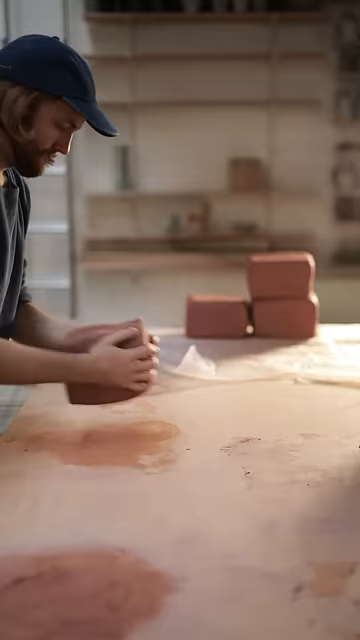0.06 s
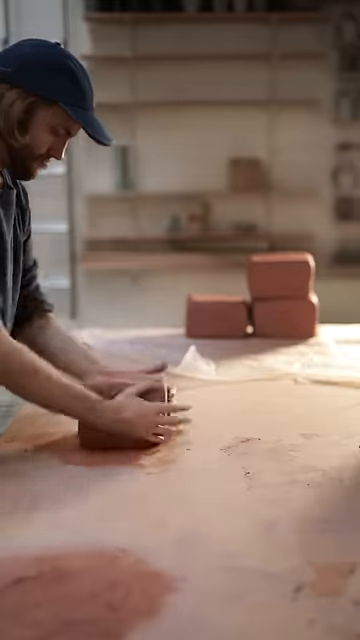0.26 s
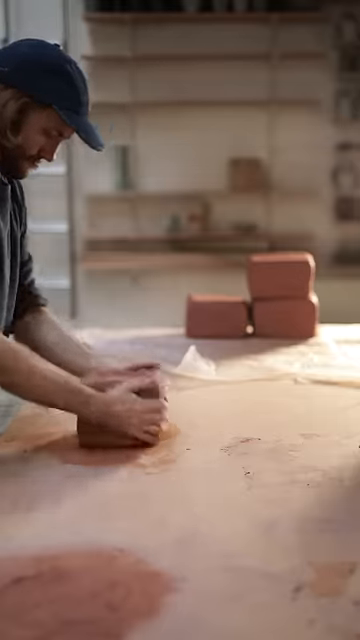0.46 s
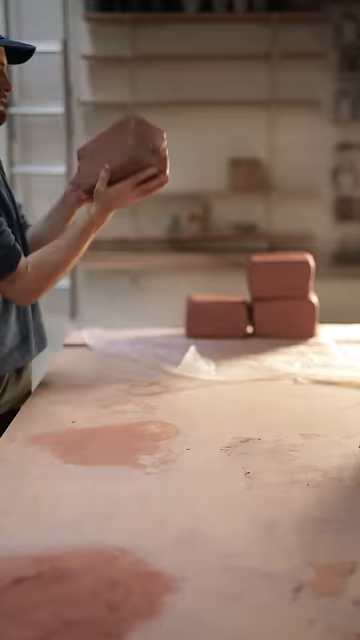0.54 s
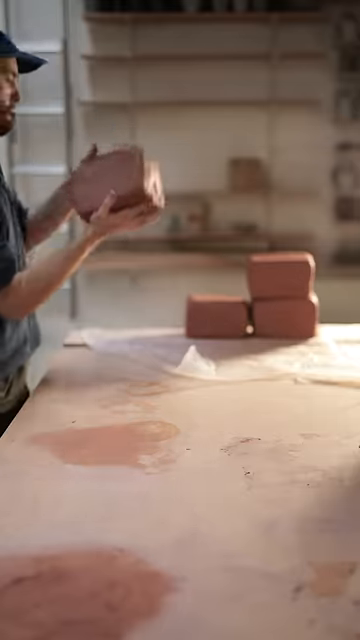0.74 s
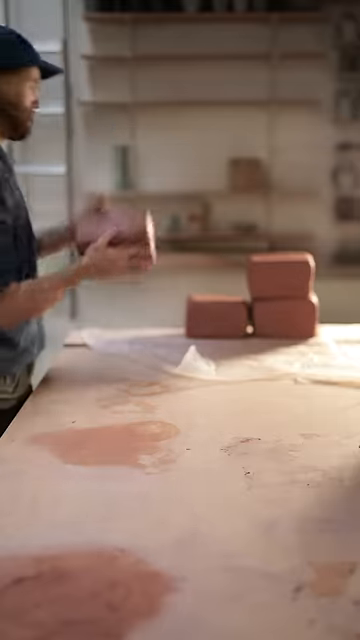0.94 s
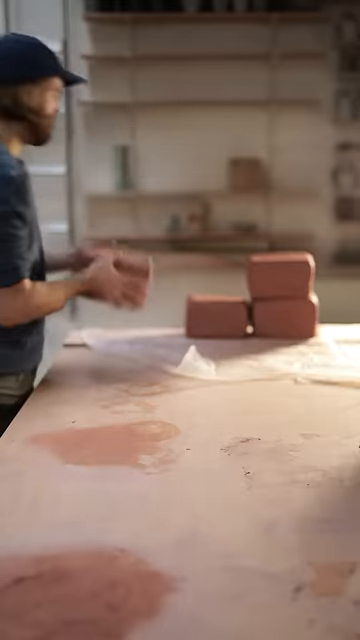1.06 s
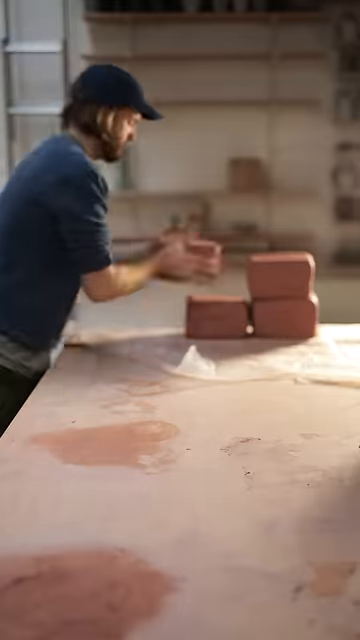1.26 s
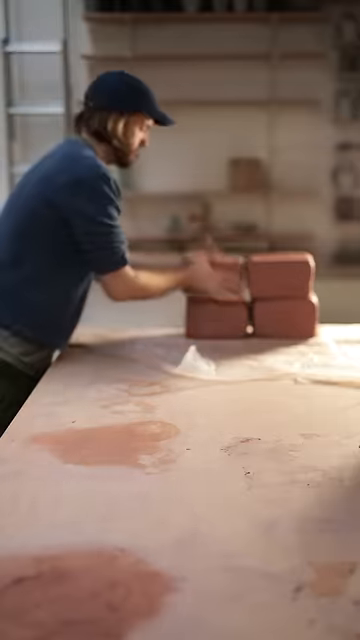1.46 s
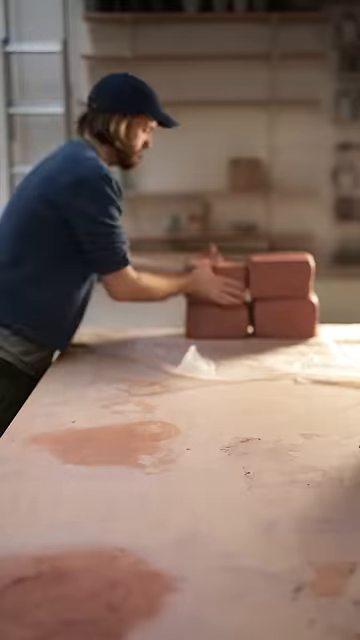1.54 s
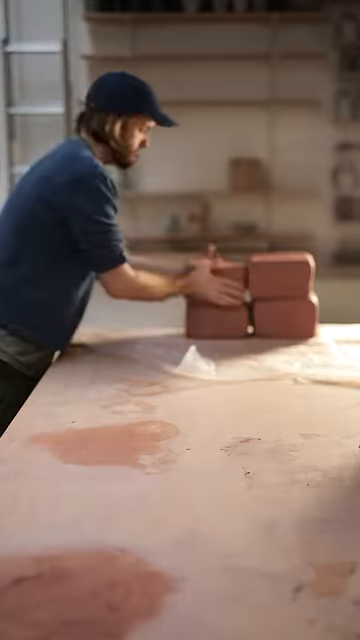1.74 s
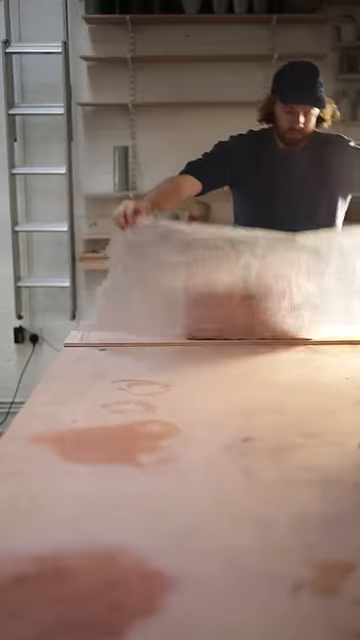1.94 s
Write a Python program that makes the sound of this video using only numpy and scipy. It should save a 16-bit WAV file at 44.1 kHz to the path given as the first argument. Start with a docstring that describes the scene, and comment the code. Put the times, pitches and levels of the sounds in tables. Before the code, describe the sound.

A heavy clay block slams onto a wooden table, then thuds onto a stack.

```python
"""A heavy block of wet clay is slammed on a wooden workbench, picked up, caught and set on a stack.
Each impact excites damped modes, and the workshop reverberates after every blow. Palms slap the clay,
peel away and slide with friction noise; clothes and feet shuffle over the quiet air of the room.
The slam overloads a limiter, which ducks and then lets the reverberation swell back."""
import sys
import numpy as np
from scipy import signal
from scipy.fft import rfft, irfft
from scipy.io import wavfile
from scipy.ndimage import map_coordinates

SR = 44100
rng = np.random.default_rng(int(sys.argv[2]) if len(sys.argv) > 2 else 0)


def master_out(mix):
    """Clip the mix to full scale and print it as 16-bit PCM to the path in sys.argv[1]."""
    frames = np.transpose(np.atleast_2d(mix))
    ceiling = np.clip(frames, -1, 1)
    pcm = np.round(ceiling * 32767).astype(np.int16)
    wavfile.write(sys.argv[1], SR, pcm)


N = 88200
T = np.arange(N) / SR
BUILD_UP_S = 0.0068
CRACKLE_PER_S, CRACKLE_DB = 400, 4

# Spectrum of a wet contact: frequency_hz, level_db
SMACK_SPECTRUM = [(40, -52), (200, -24.5), (800, -2), (1700, 4), (3000, -4), (4400, -7.5), (7000, -6.5),
                  (8500, -13), (11000, -10.5), (13500, -19), (16000, -34)]


def amp(db):
    """Amplitude ratio of a level in decibels."""
    return 10 ** (np.asarray(db) / 20)


def unit(x):
    """Normalisation to rms 1."""
    return x / np.sqrt(np.mean(x ** 2) + 1e-20)


def along(points, hz):
    """Interpolation of (frequency, value) points on a logarithmic frequency axis."""
    frequencies, values = np.transpose(points)
    return np.interp(np.log(hz + 1), np.log(frequencies + 1), values)


def noise(spectrum):
    """Spectral shaping of white noise; the result has rms 1, so the spectrum's levels are relative."""
    gain = amp(along(spectrum, np.fft.rfftfreq(N, 1 / SR)))
    return unit(irfft(rfft(rng.standard_normal(N)) * gain, N))


def fade(t60, t=T):
    """Exponential decay by 60 dB in t60 seconds."""
    return np.exp(-np.log(1000) * t / np.maximum(t60, 1e-4))


def rise(seconds):
    """Smooth onset with a finite rise time."""
    return 1 - np.exp(-(T / seconds) ** 2)


def swell(start_s, rise_s, hold_s, release_s):
    """Trapezoidal envelope of a stroke."""
    return np.interp(T, start_s + np.cumsum([0, rise_s, hold_s, release_s]), [0, 1, 1, 0])


def grain(per_s, depth_db):
    """Random amplitude modulation of rms 1."""
    wander = map_coordinates(rng.standard_normal(N // 8), [T * per_s], mode="wrap")
    return unit(amp(depth_db * wander))


def ring(modes):
    """Superposition of damped modes struck together."""
    return sum(amp(db) * np.sin(2 * np.pi * hz * T) * fade(t60) for hz, db, t60 in modes)


def at(start_s, x):
    """Time shift; a negative start leaves only the tail."""
    shift = int(round(start_s * SR))
    return np.pad(x, (shift, 0))[:N] if shift >= 0 else np.pad(x, (0, -shift))[-shift:]


def lowcut(x, hz):
    """High-pass filter: the contact sounds carry no deep bass."""
    return signal.sosfilt(signal.butter(3, hz, "high", fs=SR, output="sos"), x)


def room(spectrum):
    """Reverberation: the diffuse field builds up, then each frequency decays at its own rate."""
    # Reverberation time of the workshop: frequency_hz, t60_s
    decay_times = [(60, 0.5), (150, 0.62), (400, 0.39), (1000, .52), (2500, 0.5), (6000, 0.43),
                   (10000, 0.41), (15000, 0.27)]
    hz, t, bands = signal.stft(noise(spectrum), SR, nperseg=512)
    decaying = bands * fade(along(decay_times, hz)[:, None], t)
    return signal.istft(decaying, SR, nperseg=512)[1][:N] * rise(BUILD_UP_S)


def slams():
    """Impact excitation: the flat face claps, splats and displaces air; bench and room ring on."""
    # Blows on the bench, the first heard only as a tail: start_s, level_db
    blows = [(-.19, 3), (0.2677, 3)]
    # Modes of the bench and the air squeezed from under the block: pitch_hz, level_db, t60_s
    clap_modes = [(413, -3, 0.15), (1052, 19, 0.017), (1247, 9.5, 0.013), (1594, -5, 0.005),
                  (2120, -13, 0.0083), (3500, -4, 0.003)]
    # Lightly damped bench modes: pitch_hz, level_db, t60_s
    bench_modes = [(113.76, 3, 0.43), (180.2, -8, .6), (373, 5.5, 0.41), (515, 4.5, 0.22),
                   (803, -11, 0.477), (862, -6.5, 0.4), (1012, -6.5, 0.52), (1283, -2, 0.32)]
    # Spectrum sent into the room: frequency_hz, level_db
    room_spectrum = [(25, -58), (50, -25.5), (80, -14), (115, -10.5), (170, -12.5), (225, -12.5), (300, -6),
                     (370, -2), (480, -4), (660, -5), (1000, -6), (1350, -9), (1600, -13.5), (2100, -14),
                     (2500, -22), (3400, -22.5), (5100, -33), (7000, -25.5), (8500, -36), (11000, -36.5),
                     (13500, -45.5), (15500, -62)]
    attack_s, puff_s = 0.0015, 0.0014
    clap = ring(clap_modes) * rise(attack_s)
    puff = amp(-9) * (1 - T / puff_s) * np.exp(-T / puff_s) * rise(attack_s)
    strongest_db = max(db for hz, db, t60 in bench_modes)
    bench = amp(-15.5 - strongest_db) * ring(bench_modes) * rise(BUILD_UP_S)
    out = np.zeros(N)
    for start_s, db in blows:
        splat = at(0.002038, amp(1) * noise(SMACK_SPECTRUM) * fade(t60=0.0179))
        reverb = amp(-7) * room(room_spectrum)
        out += at(start_s, amp(db) * (clap + splat + puff + bench + reverb))
    return out


def workshop_air():
    """Ambient noise: the quiet air of the workshop is a stationary floor."""
    # Spectrum of the ambience: frequency_hz, level_db
    spectrum = [(15, -58), (25, -24), (107, -19.5), (193, -7.5), (221, -22.5), (253, -7.5), (305, -15.5),
                (523, -21.5), (648, -21), (703, -15.5), (3000, -30), (5010, -38.5), (15500, -31.5)]
    return amp(-56.5) * noise(spectrum)


def pats():
    """Cavity resonance: air caught between palms and clay faces pops with a hollow note and a smack."""
    # Contacts: start_s, level_db, pitch_hz, decay_cycles, smack_db, room_db
    touches = [(0.1995, -4, 1570, 7.1, -17, -32), (0.2056, -25.5, 990, 12, -6, -44),
               (0.2103, -15.5, 1402, 17, -13, -38), (0.7876, -42, 2200, 6.5, 5.5, -8),
               (.7978, -44.5, 1700, 7.1, 11.5, -18), (0.8004, -47.5, 1180, 8, 5.5, -18),
               (0.9502, -32, 1760, 46, -7, -14.5), (0.9578, -37.5, 2220, 13, -1, -10),
               (.9632, -19.5, 565, 3.7, -6.5, -23), (1.5636, -18, 1210, 30, -6.5, -26),
               (1.6206, -24, 2950, 50, -1.5, -11)]
    # Spectrum sent into the room: frequency_hz, level_db
    room_spectrum = [(100, -20.5), (300, -0.5), (550, 9), (1100, -4), (2200, -1.5), (3500, -9),
                     (7500, -13.5), (12000, -28.5), (16000, -35)]
    out = np.zeros(N)
    for start_s, db, hz, cycles, smack_db, room_db in touches:
        pop = ring([(hz, 0, cycles / hz)])
        smack = amp(smack_db) * noise(SMACK_SPECTRUM) * fade(t60=0.012)
        direct = lowcut((pop + smack) * rise(seconds=0.00032), hz=278)
        reverb = amp(room_db) * room(room_spectrum)
        out += at(start_s, amp(db) * (direct + reverb))
    return out


def peels():
    """Adhesion: wet skin crackles as it peels off the clay."""
    # Separations: start_s, level_db, t60_s
    releases = [(0.201, -22, .17)]
    # Spectrum of the crackle: frequency_hz, level_db
    spectrum = [(300, -25), (800, 2.5), (2400, 5.5), (4500, -11), (7000, -6.5), (11000, -6.5), (16000, -26)]
    return sum(at(start_s, amp(db) * noise(spectrum) * grain(CRACKLE_PER_S, CRACKLE_DB) * fade(t60))
               for start_s, db, t60 in releases)


def slides():
    """Sliding friction: skin hisses over smooth clay, drags where it presses harder, sticks and slips."""
    # Hand strokes: start_s, rise_s, hold_s, release_s, hiss_db, drag_db
    strokes = [(0.504, .07, 0.038, 0.089, -53, -52), (0.657, 0.093, 0.021, 0.011, -83, -56.5),
               (1.765, 0.081, 0.076, 0.27, -55, -43)]
    # Spectrum of light friction: frequency_hz, level_db
    hiss_spectrum = [(1500, -27), (5000, -16), (7500, -2.5), (11000, -0.5), (13500, -7.5), (16000, -17)]
    # Spectrum of heavy friction: frequency_hz, level_db
    drag_spectrum = [(88, -42), (150, -11), (221, -13), (257, -6), (289, -38), (324, -8), (486, -1.5),
                     (612, -6.5), (2310, -4.5), (3970, -13), (9820, -12.5), (15000, -37.5)]
    # A fingertip sticks and lets go: start_s, level_db
    slips = [(1.831, -36.5), (1.858, -35), (1.933, -41.5)]
    out = np.zeros(N)
    for *timing, hiss_db, drag_db in strokes:
        envelope = swell(*timing) * grain(per_s=300, depth_db=1.3)
        out += envelope * (amp(hiss_db) * noise(hiss_spectrum) + amp(drag_db) * noise(drag_spectrum))
    for start_s, db in slips:
        out += at(start_s, amp(db) * noise(hiss_spectrum) * fade(t60=0.01))
    return out


def thuds():
    """Damped impact: clay gives a snap and a dull knock, and squelches as the damp faces close."""
    # The block rocks on the bench, then lands on the stack: start_s, level_db, wet_db, pitch_ratio
    landings = [(.610, -21.5, -10, 1.15), (1.5659, -0.5, 1, 1)]
    # Modes of clay on clay: pitch_hz, level_db, t60_s
    clay_modes = [(357.4, -5.5, 0.047), (478.6, -12.5, 0.075), (1157, -12, 0.028), (1360, -21, 0.079),
                  (1560, -24, 0.12), (2050, -23, .02), (3163, -43, 0.15)]
    # Spectrum of the squelch: frequency_hz, level_db
    squelch_spectrum = [(300, -30), (1300, -12), (2200, -4.5), (3200, -17), (4600, 10.5), (5600, -25),
                        (7200, 2.5), (8400, -14), (9500, 10), (11500, -13), (16000, -30.5)]
    # Spectrum sent into the room: frequency_hz, level_db
    room_spectrum = [(60, -47), (100, -22), (210, -18.5), (265, -6.5), (310, -3.5), (380, 1.5), (490, -1.5),
                     (600, -10.5), (850, -11.5), (1150, -10.5), (1580, -13), (1900, -21), (2600, -23),
                     (3120, -20), (4000, -27.5), (5500, -33.5), (7300, -25.5), (9700, -35), (15500, -54.5)]
    attack_s = 0.001
    out = np.zeros(N)
    for start_s, db, wet_db, pitch_ratio in landings:
        modes = [(hz * pitch_ratio, level, t60) for hz, level, t60 in clay_modes]
        knock = lowcut(ring(modes) * rise(attack_s), hz=250)
        snap = at(attack_s, amp(wet_db - 17) * noise(SMACK_SPECTRUM) * fade(t60=0.0074))
        crackle = noise(squelch_spectrum) * grain(CRACKLE_PER_S, CRACKLE_DB)
        squelch = amp(wet_db - 35) * crackle * fade(t60=0.31) * rise(BUILD_UP_S)
        reverb = amp(-18) * room([(hz * pitch_ratio, level) for hz, level in room_spectrum])
        out += at(start_s, amp(db) * (walls(knock + snap) + squelch + reverb))
    return out


def walls(x):
    """Early reflection: delayed, weaker copies follow the direct sound."""
    # Distinct wall echoes: delay_s, level_db
    echoes = [(0.0124, -13), (0.0456, -15)]
    return x + sum(amp(db) * at(delay_s, x) for delay_s, db in echoes)


def shuffles():
    """Friction noise of clothes and feet as the potter steps to the stack."""
    # Movements: start_s, rise_s, hold_s, release_s, level_db
    steps = [(1.079, 0.037, 0.052, 0.28, -55.5), (1.34, 0.039, 0.036, 0.2, -59.5)]
    # Spectrum of the rustle: frequency_hz, level_db
    spectrum = [(47, -64), (80, -38), (190, -2), (222, -20), (444, -8), (872, -23), (942, -24), (1530, -28),
                (8000, -47), (10400, -78), (17600, -120)]
    rustle = sum(amp(db) * swell(*timing) * noise(spectrum) for *timing, db in steps)
    return rustle * grain(per_s=74, depth_db=-1.5)


def scene():
    """Superposition of all sources at one point."""
    return (slams() + workshop_air() + pats() + peels() + slides() + thuds() + shuffles())[None]


def record(dry):
    """Peak limiting: the gain falls too late for the slam, which clips; a filter softens the top."""
    # Frequency response after clipping: frequency_hz, gain_db
    response = [(20, -3), (60, -1.5), (7000, -0.5), (11000, -2), (14000, -4), (16000, -9)]
    limit_db, attack_s, recover_db_per_s, top_hz = -3.5, 0.0013, 132.5, 16000
    over_db = np.maximum(20 * np.log10(np.abs(dry[0]) + 1e-9) - limit_db, 0)
    recovery_db = recover_db_per_s * T
    held_db = np.maximum.accumulate(over_db + recovery_db) - recovery_db
    pole = np.exp(-1 / (SR * attack_s))
    duck_db = signal.lfilter([1 - pole], [1, -pole], held_db)
    clipped = np.clip(dry * amp(-duck_db), -1, 1)
    hz = np.fft.rfftfreq(2 * N, 1 / SR)
    gain = amp(along(response, hz)) * (hz < top_hz)
    return irfft(rfft(clipped, 2 * N) * gain)[:, :N]


dry = scene()
out = record(dry)
master_out(out)
```